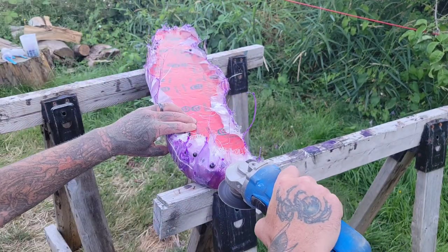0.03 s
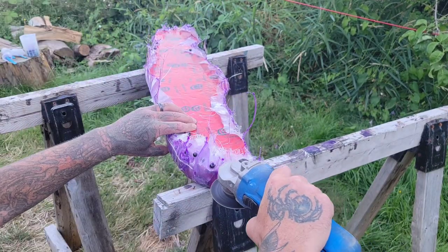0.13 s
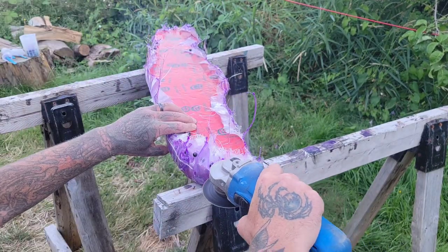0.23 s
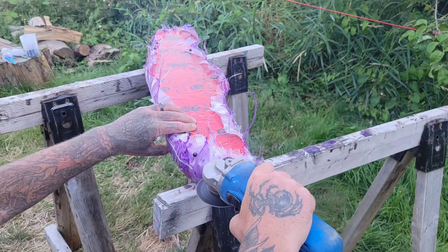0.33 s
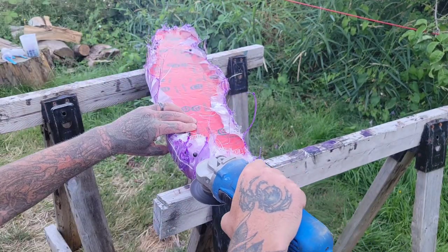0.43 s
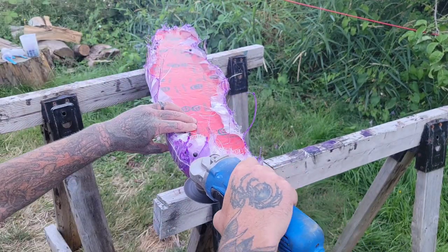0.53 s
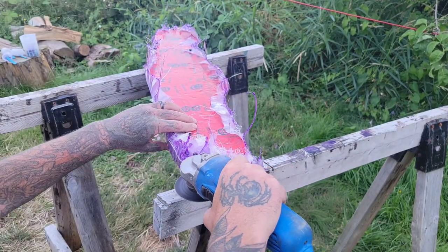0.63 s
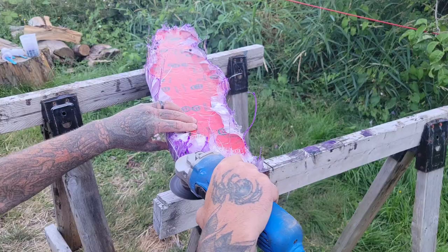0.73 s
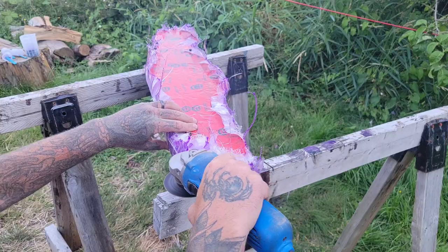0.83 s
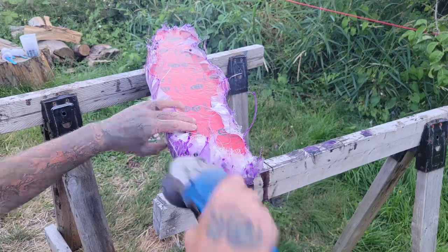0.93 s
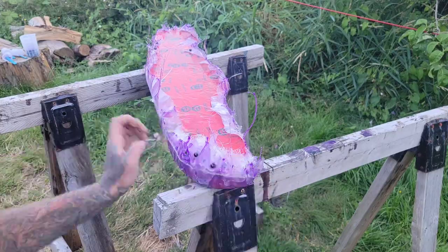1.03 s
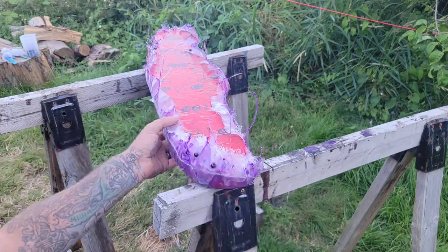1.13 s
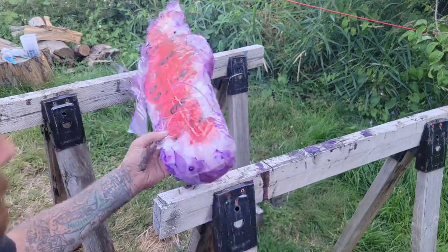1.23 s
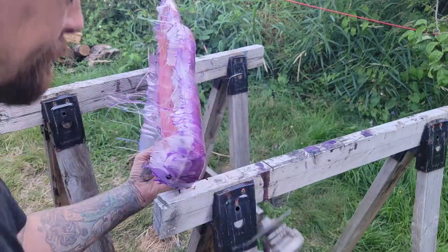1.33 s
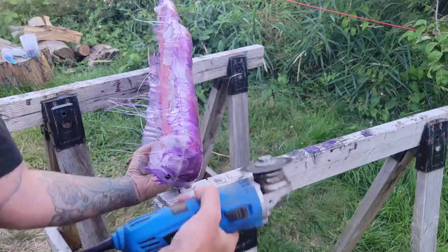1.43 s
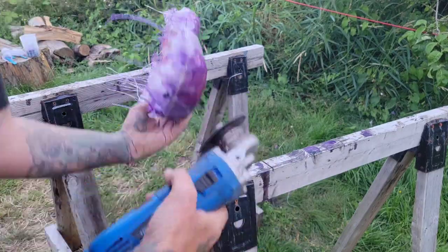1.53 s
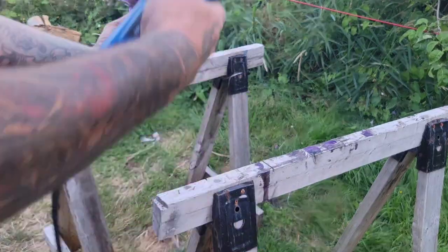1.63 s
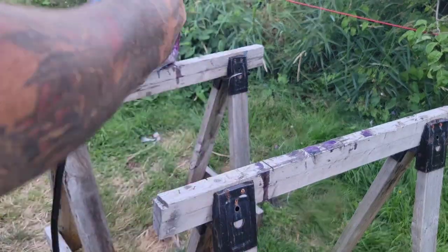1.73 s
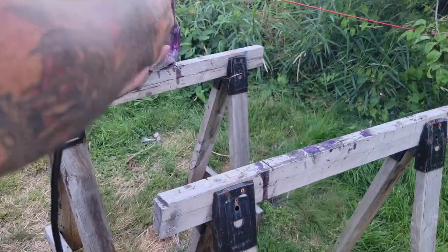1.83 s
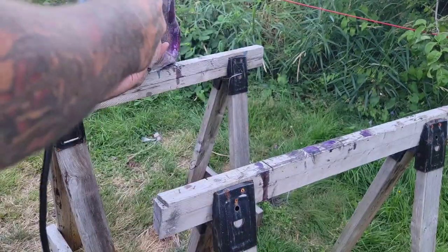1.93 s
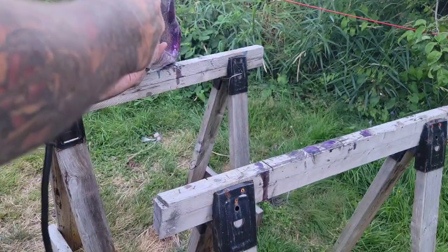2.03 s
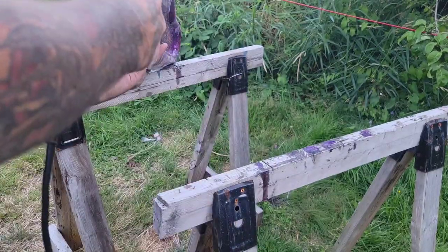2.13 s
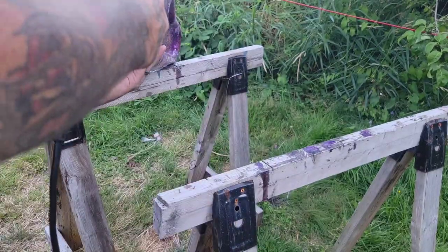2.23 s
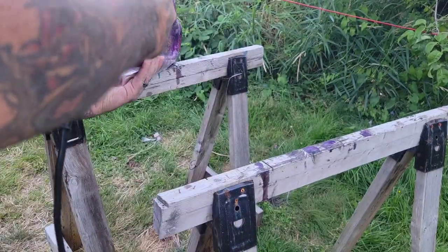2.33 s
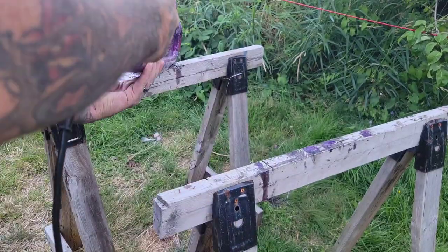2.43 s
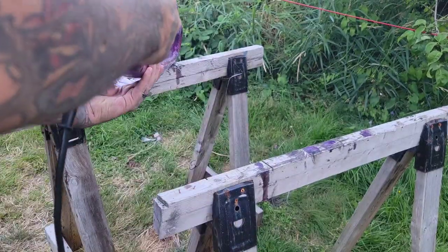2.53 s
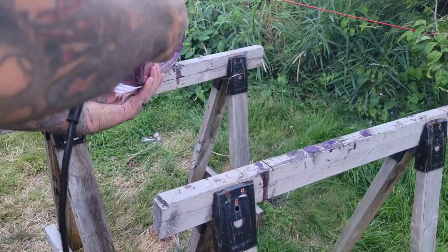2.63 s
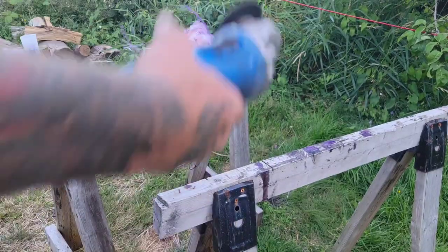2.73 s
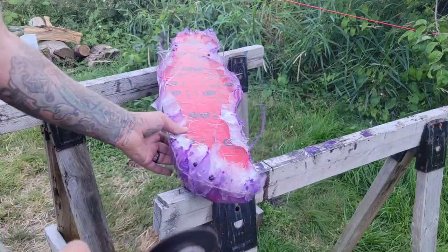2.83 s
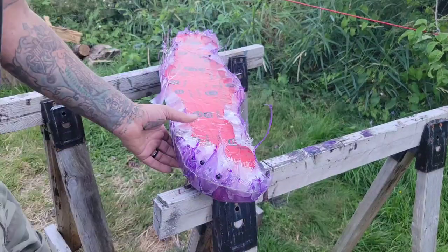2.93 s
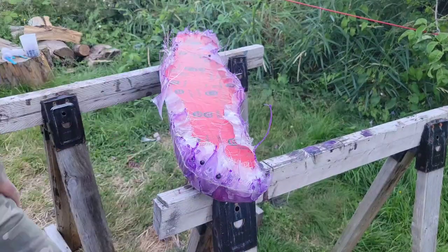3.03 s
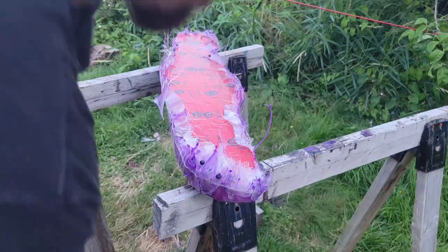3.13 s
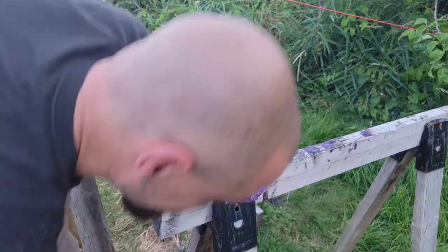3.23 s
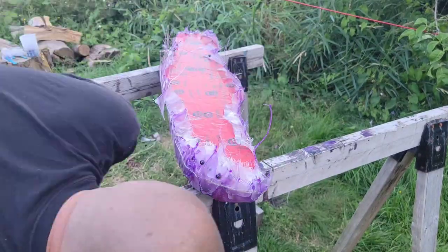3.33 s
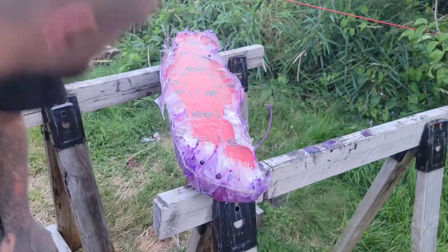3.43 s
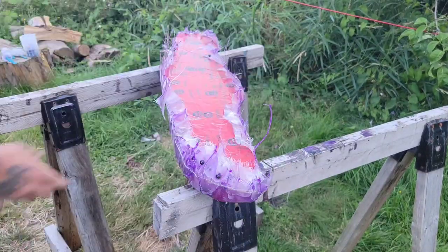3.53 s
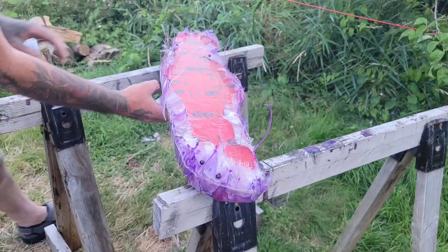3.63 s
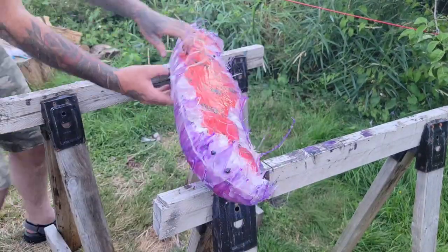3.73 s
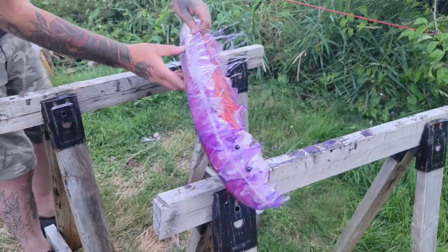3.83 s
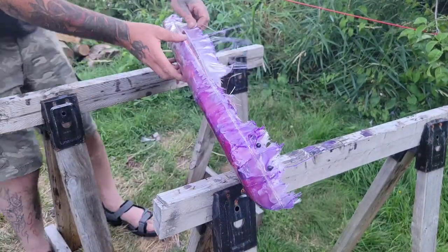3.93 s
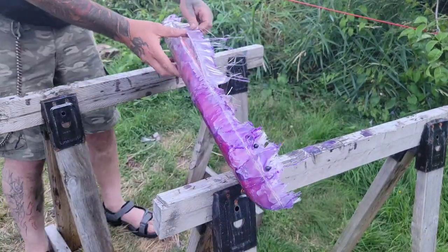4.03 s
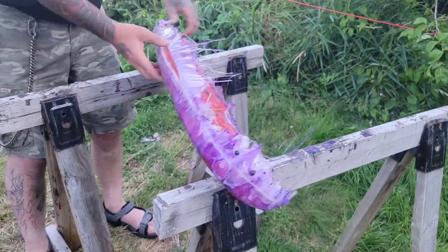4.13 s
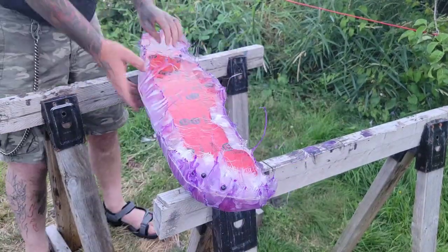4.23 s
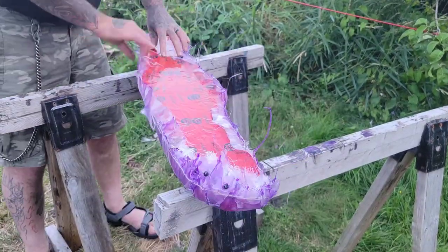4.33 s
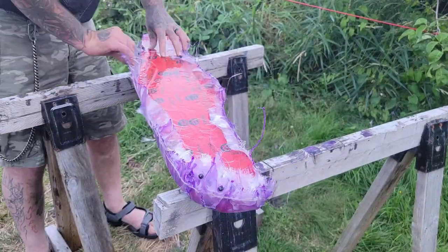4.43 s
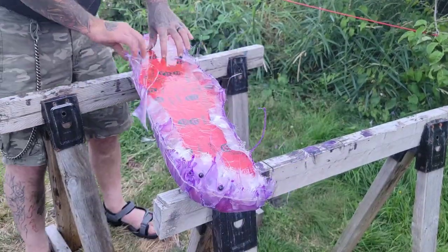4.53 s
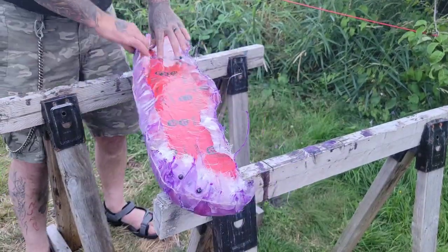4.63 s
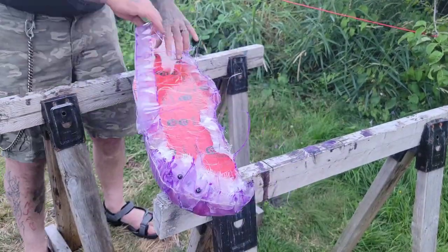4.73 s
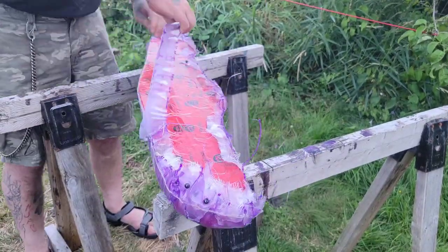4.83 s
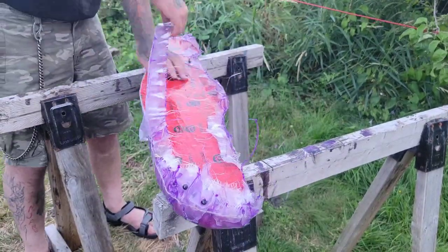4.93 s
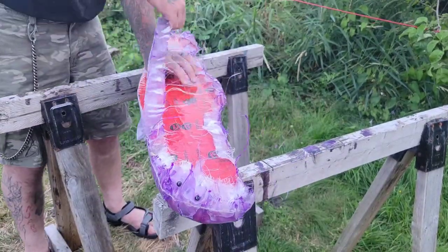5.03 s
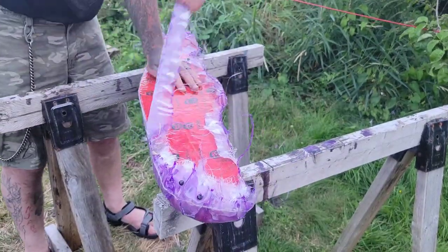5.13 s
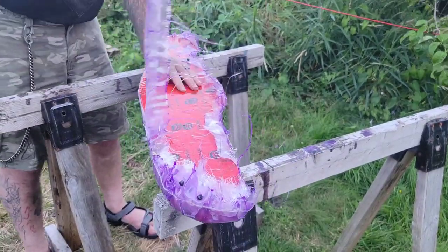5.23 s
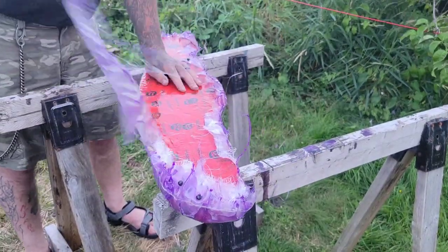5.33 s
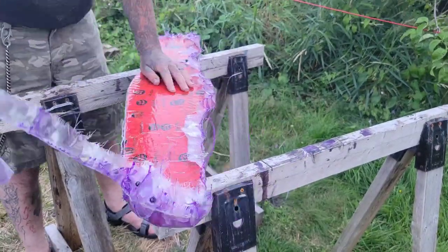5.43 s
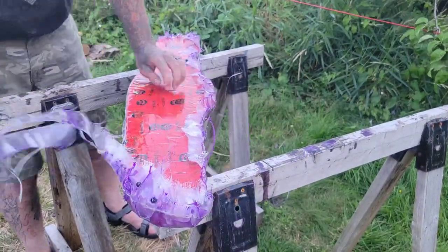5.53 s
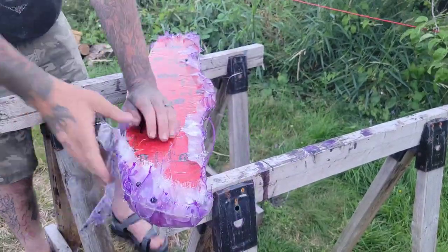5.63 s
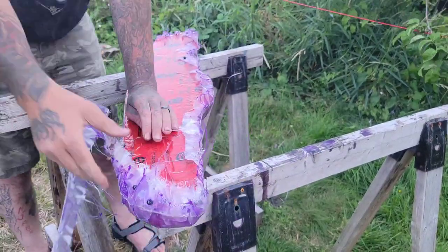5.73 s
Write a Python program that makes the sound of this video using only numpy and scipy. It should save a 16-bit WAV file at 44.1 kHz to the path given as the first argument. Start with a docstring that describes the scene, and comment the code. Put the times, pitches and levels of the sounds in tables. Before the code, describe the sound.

Outdoors, a harsh electric grinder cuts, dips, revs again and winds to a stop; afterwards quiet film snaps, rustles and wind rumble.

```python
"""An angle grinder bites into a composite shell on trestles in a garden, coasts, spins up again and runs down.
Its rotor and commutator sound as sine waves that follow the motor speed; gears, fan and brushes are shaped noise.
In the cut the disc knocks once a turn, ringing the panel, and grit scrapes; loose gears slap.
Then hands peel crackling film off the shell: clicks and grainy noise bursts, some knocking the hollow shell.
Low, lumpy noise is the wind on both microphone ports, over a faint hiss of far leaves and air."""
import sys
import numpy as np
from scipy import signal
from scipy.fft import rfft, irfft, next_fast_len
from scipy.io import wavfile
from scipy.ndimage import uniform_filter1d, map_coordinates

SR = 44100
rng = np.random.default_rng(int(sys.argv[2]) if len(sys.argv) > 2 else 0)


def int16_out(signal):
    """Quantize to a 16-bit WAV file."""
    q = np.round(np.clip(np.atleast_2d(signal).T, -1, 1) * 32767)
    wavfile.write(sys.argv[1], SR, q.astype(np.int16))


N = 254456
SECONDS = np.arange(N) / SR


def amp(db):
    """Gain of a level in dB."""
    return 10 ** (np.asarray(db) / 20)


def unit(x):
    """x at rms 1."""
    return x / np.sqrt(np.mean(x ** 2) + 1e-20)


def tallest(x):
    """x with its peak at 1."""
    return x / np.max(np.abs(x))


def balance(db):
    """Left and right gains that differ by this many dB."""
    return amp([db / 2, -db / 2])


def curves(rows):
    """One value per sample for each column after the time."""
    s, *columns = np.transpose(rows)
    return [np.interp(SECONDS, s, column) for column in columns]


def swell(s, half_s):
    """A bell-shaped rise and fall around a moment."""
    return np.exp(-((SECONDS - s) / half_s) ** 2)


def wobble(rate):
    """A smooth random curve, rate knots a second."""
    knots = rng.standard_normal(int(N * rate / SR) + 4)
    return map_coordinates(knots, [np.arange(N) * rate / SR])


def filtered(x, response):
    """x times a complex response of frequency."""
    m = next_fast_len(N + 8192)
    return irfft(rfft(x, m) * response(np.fft.rfftfreq(m, 1 / SR)), m)[..., :N]


def colour(points):
    """Response through (Hz, dB) points on a log axis."""
    f, db = np.transpose(points)
    return lambda hz: amp(np.interp(np.log(hz + 1), np.log(f + 1), db))


def modes(rows):
    """Causal response of (Hz, width Hz, dB) resonances, added with alternating sign."""
    def response(f):
        total = 0
        for k, (centre, width, db) in enumerate(rows):
            total += (-1) ** k * amp(db) * 1j * f * width / (centre * centre - f * f + 1j * f * width)
        return total
    return response


def peak(x, hz, width_hz):
    """One resonance with steep flanks: the same filter twice."""
    b, a = signal.iirpeak(hz, hz / width_hz, SR)
    return signal.lfilter(b, a, signal.lfilter(b, a, x))


def pair(spread, patchy_db):
    """Stereo noise with patches of random gain; spread 0 is mono, .5 unrelated, 1 opposed."""
    z = signal.stft(rng.standard_normal((2, N)), nperseg=512)[2]
    patches = rng.standard_normal(z.shape[1:])
    for axis in (0, 1):
        patches = uniform_filter1d(patches, size=6, axis=axis)
    shared, opposed = signal.istft(z * amp(patchy_db * unit(patches)), nperseg=512)[1][:, :N]
    turn = np.clip(spread, 0, 1) * np.pi / 2
    shared, opposed = np.cos(turn) * shared, np.sin(turn) * opposed
    return np.array([shared + opposed, shared - opposed])


# How fast the motor spins. Each row: time in seconds, rotor turns a second in Hz.
MOTOR_SPEED = [(0, 556), (.17, 547), (.36, 553), (.55, 544), (.73, 548), (.89, 543), (.925, 547),
               (.95, 562), (1.0, 570), (1.08, 583), (1.17, 588), (1.21, 535), (1.26, 484), (1.38, 398),
               (1.5, 312), (1.69, 180), (1.695, 352), (1.725, 365), (1.79, 497), (1.88, 553), (1.97, 576),
               (2.12, 586), (2.26, 580), (2.37, 557), (2.64, 547), (2.69, 528), (2.8, 415), (3.0, 265),
               (3.12, 200), (3.73, 5)]


def rotor_turns():
    """Counts the turns of the rotor so far, with a slight flutter of speed; also gives the plain speed."""
    speed = curves(MOTOR_SPEED)[0]
    unsteady_speed = uniform_filter1d(speed, size=300) * (1 + 0.00092 * wobble(30))
    return np.cumsum(unsteady_speed) / SR, speed


# How loud each part is at each speed, before the tool's nearness and the other changes below.
# Each row: rotor speed in Hz, then hum, fan air, gear rattle, housing hiss and brush hiss, all in dB.
LEVELS_BY_SPEED = [(5.03, -120, -105, -87, -97.5, -84), (18.5, -120, -70.5, -68, -93, -77),
                   (50.4, -120, -57, -50.5, -86, -68.5), (124, -110, -52.5, -41, -58.5, -47.5),
                   (211, -61.5, -46, -40, -49.5, -41.5), (283, -55, -43.5, -36, -43.5, -39.5),
                   (332, -43.5, -43, -35, -40.5, -40), (476, -51, -39, -32, -37.5, -36.5),
                   (526, -44, -39, -34, -36.5, -34.5)]


def at_speed(speed):
    """Levels of the hum and the four noises at this rotor speed."""
    hz, *columns = np.transpose(LEVELS_BY_SPEED)
    return [np.interp(speed, hz, column) for column in columns]


# How the grip faces the ports, for the hum here and the noises below. Each row: time in seconds,
# how much earlier left hears in ms, left lead of the hum in radians, stereo spread from 0 to 1,
# fan air left over right in dB.
GRIP_FACING = [(0, 0.004, -4, 0.3, -5), (.9, 0.078, 0.4, 0.22, -2), (1.64, 0.0079, 0.6, 0.48, 2),
               (1.72, 0.19, 2.06, 0.29, -2.5), (2.68, 0.16, 2.5, 0.3, 3.5), (2.95, 0.16, 0.97, 0.39, 1.5),
               (3.3, 0.058, .9, 0.33, -0.5)]
# The hum as the grip turns. Each row: time in seconds, dB above its level for the speed, left over right in dB.
HUM_CHANGES = [(0, 2, 3), (.5, -4.5, 2), (.95, -1.5, 3), (1.03, -8.5, 1), (1.1, 1.5, 3), (1.2, 5, 2),
               (1.3, 3.5, 1), (1.41, 4, -1), (1.5, -3.5, -4), (1.69, -7, -4), (1.72, 0, -4), (1.8, 5.5, 0),
               (2.0, 0.5, 0.5), (2.3, 1, 3.5), (2.65, -0.5, 3), (2.9, 4, -1), (3.1, 2, -8)]
# The commutator whine. Each row: time in seconds, level in dB before wobble and nearness.
WHINE_LEVEL = [(0, -45), (.15, -38.5), (.4, -40), (.58, -46), (.7, -37), (.88, -35), (.94, -40), (.96, -33),
               (1.07, -30.5), (1.11, -39), (1.17, -38), (1.195, -37), (1.23, -45), (1.26, -39), (1.44, -41),
               (1.6, -56), (1.75, -56), (1.8, -36.5), (2.0, -27.5), (2.17, -26.5), (2.3, -41), (2.4, -40),
               (2.68, -35), (2.71, -49), (3.1, -60), (3.3, -100)]
# The octave of the whine. Each row: time in seconds, level in dB before wobble and nearness.
OCTAVE_LEVEL = [(.9, -90), (1.0, -38), (1.19, -35), (1.26, -90), (1.82, -90), (1.92, -37), (2.22, -36),
                (2.3, -120)]
BARS = 12  # commutator bars passing the brushes in one rotor turn
FREE_HZ = 588  # rotor speed when it runs free
BLUR_RAD = 3  # phase wander of the whine, scaled by how unsteady the rotor is


def tones(turns, speed):
    """The unbalanced rotor hums once a turn; bars passing the brushes whine, with an octave above."""
    lead_rad = curves(GRIP_FACING)[1]
    more_db, pan_db = curves(HUM_CHANGES)
    hum_db = at_speed(speed)[0] + more_db + 1.64 * wobble(40)
    lead = np.array([lead_rad / 2, -lead_rad / 2])
    hum = amp(hum_db) * balance(pan_db) * np.sin(2 * np.pi * turns + lead)

    unsteady = np.clip(.98 - speed / FREE_HZ, 0, 1)  # rougher as the rotor slows
    whine_db = curves(WHINE_LEVEL)[0] + (1.5 + 6.1 * unsteady) * wobble(40.09)
    blur = BLUR_RAD * unsteady * wobble(150)
    whine = amp(whine_db) * np.sin(2 * np.pi * BARS * turns + blur + [[.75], [-.75]])

    octave_db = curves(OCTAVE_LEVEL)[0] + 2.0 * wobble(44)
    return hum + whine + amp(octave_db) * np.sin(4 * np.pi * BARS * turns)


# The tone of the gear rattle. Each row: pitch in Hz, level in dB per Hz before the whole is set to its level.
RATTLE_TONE = [(760, -32), (1300, -30.5), (1820, -5.5), (2220, -6.5), (2780, 6), (3570, 4), (4010, -2),
               (5200, -27), (6760, -51.5), (11400, -120)]
# A duller, muffled rattle. Each row: pitch in Hz, relative level in dB per Hz.
MUFFLED_TONE = [(760, -21.5), (1300, -12), (1570, -12), (2440, 2), (2860, 0), (4520, 2), (5600, -14.5),
                (7280, -38.5), (12300, -120)]
DARK_CUTTING, DARK_FREE, DARK_SLOW = 0.85, 0.2, 0.6  # share of muffled rattle; slow is near standstill
CASE_HZ, CASE_WIDTH_HZ, CASE_DB = (2760, 3110, 3340), 70, -15  # gear case rings, each against the rattle
TEETH_HZ, TEETH_WIDTH_HZ, TEETH_DB = 3800, 400, -4.5  # slack teeth tick brighter; dB before looseness


def gear_rattle(speed, spread, loose, ticks, chatter):
    """Gear teeth rattle as noise through a clear and a muffled tone; narrow rings are the gear case."""
    slow = (1 - speed / FREE_HZ) ** 4
    dark = DARK_FREE + (DARK_CUTTING - DARK_FREE) * cutting() + (DARK_SLOW - DARK_FREE) * slow
    dark = np.clip(dark, 0, 1)
    teeth = chatter * pair(spread, 1.42)
    rattle = np.sqrt(1 - dark) * unit(filtered(teeth, colour(RATTLE_TONE)))
    rattle += np.sqrt(dark) * unit(filtered(teeth, colour(MUFFLED_TONE)))
    case = sum(unit(peak(teeth, hz, CASE_WIDTH_HZ)) for hz in CASE_HZ)
    rattle = unit(rattle + amp(CASE_DB) * case)
    bright = unit(peak(pair(spread, 1.5), TEETH_HZ, TEETH_WIDTH_HZ))
    return rattle + amp(TEETH_DB) * loose * ticks * bright


# The tones of the fan air, housing hiss and brush hiss. Each row: pitch in Hz, relative level in dB per Hz.
AIR_TONE = [(120, -77.5), (200, -27.5), (316, -15), (464, -14.5), (548, -6.5), (628, -7.5), (1370, -0.5),
            (2400, -6), (3120, -55), (5280, -120)]
HOUSING_TONE = [(2470, -22.5), (4200, -28.5), (4910, 0.5), (5760, -1), (6710, 0), (7640, 1.5), (8860, -3),
                (10800, -6), (11500, -21.5), (22000, -120)]
BRUSH_TONE = [(9000, -37), (10500, -21.5), (11500, 3.5), (12500, 9), (13800, 8.5), (15000, 8), (16000, 4)]
# The tool swung about, also used by grinder(). Each row: time in seconds, nearness in dB,
# housing hiss above that in dB, brush hiss above that in dB, left over right in dB.
TOOL_SWING = [(0, 0, -2, -0.5, 1), (.18, -2, -0.5, 0.5, 1), (.6, -0.5, -3, -4.5, 2), (.7, 0, -1, -1, 2.5),
              (.935, 0.5, -3, -3, 1.5), (.955, 1, 2.5, -1.5, 2), (1.13, -0.5, 0, 6.5, -2.5),
              (1.35, -0.5, 1.5, 3, 0), (1.6, 0, 2.5, 1, 3), (1.72, 3.5, -3.5, -2.5, 2),
              (1.8, 2.5, 1.5, -1, 2), (2.1, 1, 1, -2.5, 2.5), (2.35, 2.5, 0, -1, -0.5),
              (2.75, 4, -2, -2.5, -0.5), (2.95, 0.5, 1, 2.5, 3), (3.15, -2.5, 2.5, 3, 2.5),
              (3.4, -5.5, 0.5, -0.5, -0.5), (3.7, 3.5, 16.5, -2, -2)]
SURGE_S, SURGE_HALF_S, SURGE_DB = 2.755, 0.038, 2  # the gears rasp as the drive goes slack
HISS_PATCHY_DB = 2.7  # unevenness of both hisses
GEAR = 3.29  # rotor turns in one turn of the disc


def noises(turns, speed):
    """Fan air, gear teeth that thin out into ticks at low speed, and two hisses that swell each disc turn in the cut."""
    _, air_db, rattle_db, housing_db, brush_db = at_speed(speed)
    lead_ms, _, spread, air_pan_db = curves(GRIP_FACING)
    _, vent_db, facing_db, _ = curves(TOOL_SWING)

    hits = rng.random(N) < (150 + 4 * speed) / SR
    ticks = uniform_filter1d(hits * amp(2.1 * rng.exponential(size=N)), size=40)
    ticks = ticks / np.sqrt(np.abs(uniform_filter1d(ticks ** 2, size=4000)) + 1e-9)
    loose = np.clip(.72 - speed / 1000, 0, 1)  # the load holds the teeth together at speed
    chatter = 1 - loose + loose * ticks

    def hiss(tone, wide, patchy_db):
        return unit(filtered(pair(wide, patchy_db), colour(tone)))

    air = amp(air_db) * balance(air_pan_db) * (1 + chatter) / 2 * hiss(AIR_TONE, 0.91 * spread, 1.5)
    rattle_db = rattle_db + SURGE_DB * swell(SURGE_S, SURGE_HALF_S)
    body = air + amp(rattle_db) * gear_rattle(speed, spread, loose, ticks, chatter)
    shift = lead_ms * SR / 2000  # half the lead, in samples, for each side
    body = np.array([map_coordinates(side, [np.arange(N) + sign * shift], order=1, mode="nearest")
                     for side, sign in zip(body, (1, -1))])

    housing = amp(housing_db + vent_db) * hiss(HOUSING_TONE, 0.41, HISS_PATCHY_DB) * balance(np.array([1.2]))
    brushes = amp(brush_db + facing_db) * hiss(BRUSH_TONE, 0.27, HISS_PATCHY_DB) * balance(np.array([2.8]))
    gate = 1 + cutting() * 0.47 * np.cos(np.pi * turns / GEAR) ** 6
    return body + gate * (housing + brushes)


CUT_ENDS_S, LIFT_S = .9, 0.04  # the disc leaves the panel


def cutting():
    """1 while the disc is in the panel, fading to 0 as it lifts."""
    return np.clip((CUT_ENDS_S + LIFT_S - SECONDS) / LIFT_S, 0, 1)


# Three panel resonances, one list each. Each row: pitch in Hz, width in Hz (for one pass), level in dB
# before the knock is set to its own level.
PANEL_RINGS = [(2384, 520, 1.5)], [(4640, 850, 0)], [(3690, 1400, 0)]
# The disc bites harder. Each row: time in seconds, half length in seconds, dB more in each of the three resonances.
HARD_BITES = [(.25, 0.021, 11, 20, 1), (.345, 0.036, 12, 12, 0.96), (.42, 0.035, 8.4, 3, 0.97),
              (.7, 0.03, 0.92, 1, 3.7)]
KNOCK_DB = (-48, -53.5, -46)  # in the three panel resonances, before bites
DRONE_DB = -56  # the part with two cycles a spindle turn


def disc(turns):
    """The high spot of the disc strikes the panel once a spindle turn; the spindle drones, mostly twice a turn."""
    knocks_db = np.array(KNOCK_DB)[:, None]
    knocks_db = knocks_db + sum(np.outer(more, swell(s, half_s)) for s, half_s, *more in HARD_BITES)
    blows = np.diff(np.floor(turns / GEAR), prepend=0) * amp(1.0 * rng.standard_normal(N))
    knock = np.zeros(N)
    for db, rows in zip(knocks_db, PANEL_RINGS):
        # a soft blow: each resonance acts twice, so its flanks fall steeply
        knock += amp(db) * unit(filtered(blows, lambda f: modes(rows)(f) ** 2))
    spindle = np.sin(4 * np.pi * turns / GEAR) + 0.2 * np.sin(2 * np.pi * turns / GEAR)
    drone = amp(DRONE_DB + 1.5 * wobble(28)) * spindle
    return cutting() * (drone + np.array([knock, 0.91 * np.roll(knock, 2)]))


# Grit scraping in the cut. Each row: time in seconds, level in dB before the burst shape.
GRIT_LEVEL = [(0, -31.5), (.035, -38), (.056, -25.5), (.11, -35.5), (.166, -31.5), (.2, -46), (.246, -30.5),
              (.29, -43), (.351, -33.5), (.395, -45.5), (.466, -25.5), (.53, -34.5), (.586, -26),
              (.63, -42), (.7, -33.5), (.72, -42), (.776, -30.5), (.835, -45), (.86, -37.5), (.92, -50)]
# The tone of the scraping. Each row: pitch in Hz, relative level in dB per Hz.
SCRAPE_TONE = [(10000, -42), (11500, -10.5), (13000, 4), (15000, 9), (16000, -7)]


def grit(turns):
    """Bright scraping that bursts as the high spot of the disc passes."""
    burst = cutting() * np.cos(np.pi * turns / GEAR) ** 4
    scrape = unit(filtered(pair(.36, 1.5), colour(SCRAPE_TONE)))
    return amp(curves(GRIT_LEVEL)[0]) * burst * scrape * balance(np.array([3.2]))


# Gear teeth slapping as the drive unloads. Each row: time in seconds, level in dB before the fade, ring in Hz.
GEAR_SLAPS = [(0.95, -26.5, 2700), (0.96, -23.5, 4350), (1.5426, -20, 3200), (1.632, -21, 2940),
              (1.66, -25, 2050), (1.6925, -32.5, 2250), (1.712, -26.5, 3040), (3.021, -23, 3250),
              (3.1153, -26.5, 3800), (3.209, -34.5, 2860), (3.256, -31, 3900), (3.3048, -39.5, 3920),
              (3.349, -37, 2900), (3.371, -45.5, 3750), (3.4507, -41, 4060), (3.478, -41, 4030),
              (3.5355, -42, 3900), (3.5894, -43, 3900), (3.6043, -47, 3700), (3.6567, -43.5, 3950)]
GUARD_HZ, GUARD_DB = 7800, -14  # the disc guard rings along; dB against the main ring


def slaps():
    """Each slap rings the gear case and the guard for a few milliseconds."""
    out, t = np.zeros(N), np.arange(1300) / SR
    for s, db, hz in GEAR_SLAPS:
        ring = np.sin(2 * np.pi * hz * t) + amp(GUARD_DB) * np.sin(2 * np.pi * GUARD_HZ * t)
        ring += 0.12 * rng.standard_normal(len(t))
        fade = amp(db - 60 * t / 0.009) * (1 - np.exp(-t / 0.00024))
        out[round(s * SR):][:len(t)] += fade * ring
    return out


def grinder():
    """The whole tool, swung to and fro in front of the microphone."""
    turns, speed = rotor_turns()
    near_db, *_, pan_db = curves(TOOL_SWING)
    motor = amp(near_db) * (tones(turns, speed) + noises(turns, speed))
    return (motor + disc(turns) + grit(turns) + slaps()) * balance(pan_db)


# Film snaps. Each row: time in seconds, level in dB before scaling, ring in Hz,
# treble against that level in dB, shell knock against it in dB (both before scaling).
FILM_SNAPS = [(3.843, -40, 4560, -19, -30), (3.881, -49, 840, -17.5, -7.5), (4.357, -34, 6500, -30, -29),
              (4.428, -31, 3460, -12.5, -43), (4.435, -28.5, 7800, -20, -27),
              (4.454, -50.5, 6590, -14, -30), (4.481, -52.5, 1790, -15.5, -17),
              (4.611, -47, 2400, -27, 12.5), (4.664, -45, 1500, -14, -23), (4.689, -46, 3340, -14, -3),
              (4.726, -42.5, 2900, -26.5, 7.5), (4.765, -56.5, 6950, -7.5, -26),
              (4.786, -50.5, 3350, -12, -16), (4.837, -43.5, 810, -46.5, 5.5), (4.854, -44, 2560, -33, 1),
              (4.992, -42, 1060, -34, 7.5), (5.017, -42.5, 7050, -22.5, -2),
              (5.094, -52.5, 7510, -19.5, -1), (5.127, -43, 1110, -23.5, -12), (5.223, -51, 7450, -20, 0),
              (5.298, -43, 3870, -20, -22), (5.357, -25.5, 7500, -21.5, -48), (5.618, -51, 1250, -30, -20),
              (5.413, -30, 1740, -14.5, -33), (5.422, -35.5, 1740, -25.5, -35),
              (5.471, -45.5, 6100, -19, -38.5), (5.504, -59, 988, -24, -16), (5.619, -42.5, 3900, -15, -35),
              (5.638, -48, 3200, -28, -29), (5.705, -40.5, 4970, -26, -15)]
# Film sliding and tearing; the narrow rows ring briefly. Each row: time in seconds, length in seconds,
# level in dB before shaping, centre in Hz, width in Hz before widening, treble against that level in dB.
FILM_RUSTLES = [(3.492, 0.024, -43.5, 6700, 795, -1), (3.545, 0.017, -52, 7000, 884, 2),
                (3.794, 0.038, -61.5, 883, 39.4, 0.5), (3.795, 0.025, -65, 1170, 40, -21),
                (3.793, 0.031, -59, 2760, 1990, -6), (4.195, 0.029, -70.5, 6300, 2500, -1.5),
                (4.349, 0.03, -62.5, 6560, 3070, -7.5), (4.418, 0.023, -53, 2870, 4130, -4),
                (4.605, 0.11, -65, 1200, 1500, -3), (4.624, 0.033, -53.5, 6050, 6000, 9),
                (4.734, 0.021, -71, 2480, 2480, -15.5), (4.826, 0.041, -59, 696, 597, -18.5),
                (4.847, 0.014, -64, 1900, 2440, -12.5), (4.953, 0.126, -61, 600, 394, -22),
                (4.985, 0.0185, -61, 1100, 700, -15.5), (5.017, 0.022, -60.5, 3000, 1500, -14),
                (5.119, 0.023, -56, 1520, 1560, -2), (5.304, 0.029, -53.5, 2470, 3005, -3),
                (5.351, 0.0066, -36.5, 7260, 4000, 6.5), (5.411, 0.02, -43.5, 1830, 3060, -6),
                (5.464, 0.029, -65, 6100, 4020, -10), (5.521, 0.01, -60.5, 6840, 2980, -5),
                (5.611, 0.044, -59.5, 3620, 1320, 1.5), (5.703, 0.019, -64.5, 1300, 500, -6)]
# The hollow shell's resonances. Each row: pitch in Hz, width in Hz, relative level in dB.
SHELL_RINGS = [(342, 47, 8), (600, 360, -7)]


def film():
    """Snaps are clicks of a few milliseconds that also knock the hollow shell; rustles are ragged, grainy bursts."""
    out, knocks, t = np.zeros((2, N + SR)), np.zeros(N + SR), np.arange(SR // 8) / SR
    treble = signal.butter(3, 11000, "high", fs=SR)
    ports = np.array([[0.97, 0.29], [0.19, 0.96]])  # how two noises mix into left and right
    for s, db, hz, treble_db, knock_db in FILM_SNAPS:
        at = slice(round(s * SR), round(s * SR) + len(t))
        fade = (amp(-20 * t / 0.004) + amp(-26 - 20 * t / 0.017)) * (1 - np.exp(-t / 0.0008))
        click = fade * (ports @ rng.standard_normal((2, len(t))))
        out[:, at] += 0.51 * amp(db) * tallest(peak(click, hz, 0.3 * hz))
        bright = 6.4 * tallest(signal.lfilter(*treble, click)) + 4.8 * tallest(peak(click, 3150, 8000))
        out[:, at] += amp(db + treble_db) * bright
        thud = t / 0.0053 * np.exp(-t / 0.0033) * rng.standard_normal(len(t))
        knocks[at] += amp(db + knock_db - 5.0) * thud
    for s, length, db, hz, width_hz, treble_db in FILM_RUSTLES:
        at = slice(round(s * SR), round(s * SR) + len(t))
        shape = (1 - np.exp(-t / (0.2 * length))) / (1 + (t / length) ** 6)
        specks = (rng.random(len(t)) < .02) * rng.exponential(size=len(t))
        grains = 1.2 + 22 * uniform_filter1d(specks, size=40)
        hiss = unit(grains) * (ports @ rng.standard_normal((2, len(t))))
        band = unit(peak(hiss, hz, 1.9 * width_hz))
        out[:, at] += amp(db) * shape * (band + amp(treble_db) * unit(signal.lfilter(*treble, hiss)))
    return out[:, :N] + 12 * filtered(knocks[:N], modes(SHELL_RINGS)) * [[1], [.7]]


def fidget():
    """Faint random creases of the film while hands hold it: short decaying bursts of noise."""
    held = np.interp(SECONDS, [3.7, 3.9], [0, 1])
    creases = (rng.random(N) < 80 / SR) * amp(3.9 * rng.exponential(size=N))
    creases = signal.lfilter([1], [1, -np.exp(-1 / (0.0026 * SR))], creases)
    return amp(-81.5) * held * creases * peak(pair(0.26, 5), 3000, 9800)


# How hard the wind buffets. Each row: time in seconds, level in dB.
BUFFET_LEVEL = [(0, -65), (.75, -62), (1.4, -65), (2.7, -66), (2.95, -51), (3.09, -59), (3.14, -61.5),
                (3.45, -67), (3.82, -55.5), (3.9, -46), (3.99, -58), (4.07, -42.5), (4.25, -56),
                (4.32, -54.5), (4.42, -52), (4.55, -61), (4.8, -53), (5.03, -37.5), (5.11, -48),
                (5.38, -42.5), (5.73, -45.5), (5.77, -41)]
# The tones of the low buffet and the higher flutter. Each row: pitch in Hz, relative level in dB per Hz.
BUFFET_TONE = [(12, -31), (20, -10.5), (38, -2), (57, 2.5), (90, -1), (113, -6), (200, -31), (260, -33),
               (440, -120)]
FLUTTER_TONE = [(65, -29.5), (110, 3.5), (179, 5.5), (605, -21), (2200, -56), (4840, -120)]
# The flutter swells. Each row: time in seconds, half length in seconds, dB more.
FLUTTER_SWELLS = [(4.182, 0.046, 10), (4.65, 0.068, 11.5), (4.86, 0.032, -4), (5.022, 0.17, 11)]
# Gusts that thump the ports. Each row: time in seconds, level in dB before the thump's shape, pitch in Hz.
GUST_THUMPS = [(2.782, -45, 67), (3.077, -33.5, 68.4), (3.884, -36.5, 68.5), (4.055, -33, 44.5),
               (4.139, -40, 74), (4.197, -39, 48.1), (4.249, -37, 50.5), (4.859, -35.5, 77),
               (5.37, -36.5, 122)]
BREEZE_DB, FLUTTER_DB = -55.5, -66.5  # buffet of a light breeze, and the flutter at that buffet
FLUTTER_GROWS = 0.98  # dB of flutter gained for each dB of buffet


def wind():
    """Buffeting, lumpy and loosely related on the two ports, with single thumps of a cycle or two."""
    buffet_db, = curves(BUFFET_LEVEL)
    flutter_db = FLUTTER_DB + FLUTTER_GROWS * (buffet_db - BREEZE_DB)
    flutter_db += sum(more * swell(s, half_s) for s, half_s, more in FLUTTER_SWELLS)
    lumps = amp(3 * np.array([wobble(14), wobble(18)]))
    buffet = unit(lumps * filtered(pair(0.37, 1.3), colour(BUFFET_TONE)))
    flutter = unit(lumps * amp(4.0 * wobble(40)) * filtered(pair(0.43, 1.4), colour(FLUTTER_TONE)))
    out, t = amp(buffet_db) * buffet + amp(flutter_db) * flutter, np.arange(4000) / SR
    for s, db, hz in GUST_THUMPS:
        phase = rng.uniform(0, 2 * np.pi) + np.array([[.45], [-.45]])
        shape = amp(db + 13.5) * t / 0.012 * np.exp(-t / 0.0078)
        out[:, round(s * SR):][:, :len(t)] += shape * np.sin(2 * np.pi * hz * t + phase)
    return out


# The tone of the garden. Each row: pitch in Hz, relative level in dB per Hz.
GARDEN_TONE = [(180, -32), (300, -15.5), (439, 2), (1650, -9), (2800, -11), (5160, -17.5), (7190, -20.5),
               (11100, -45), (14200, -29.5), (15600, -38.5)]
GARDEN_DB = -70  # before a slow wobble


def garden():
    """Far leaves and air: soft noise that slowly wavers."""
    return amp(GARDEN_DB + 1.7 * wobble(5)) * unit(filtered(pair(0.6, 1.4), colour(GARDEN_TONE)))


# A dull band of the microphone port, heard on the film. Each row: pitch in Hz, gain in dB.
PORT_TONE = [(8000, 1), (10500, -4.5), (12500, -1)]


def scene():
    """All sources in the open air; the hands work nearer the left port."""
    left, right = filtered(film() + fidget(), colour(PORT_TONE))
    hands = np.array([amp(1.5) * left, np.roll(right, 5)])  # right hears 5 samples later
    return grinder() + hands + wind() + garden()


TOP_HZ = 15850  # band limit


def record(dry):
    """Keeps nothing above the band limit."""
    return filtered(dry, lambda hz: hz < TOP_HZ)


dry = scene()
out = record(dry)
int16_out(out)
```